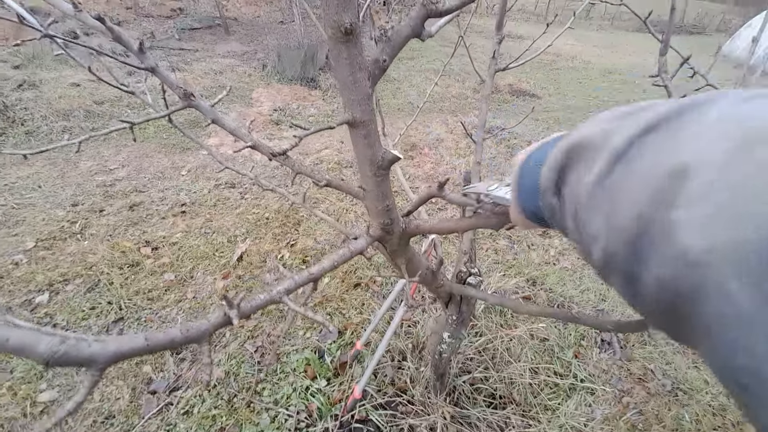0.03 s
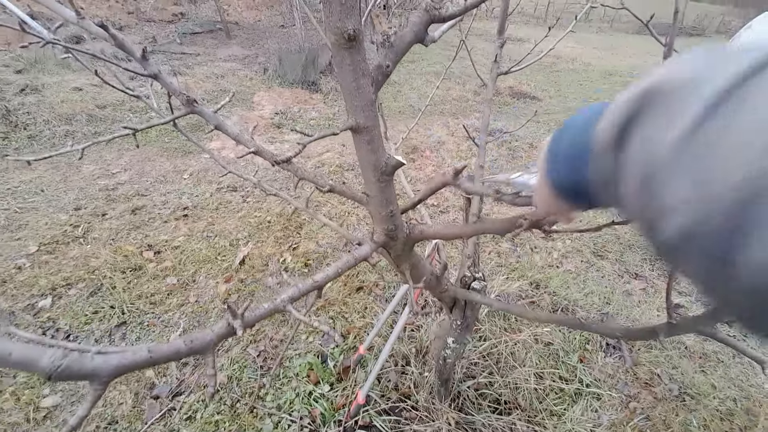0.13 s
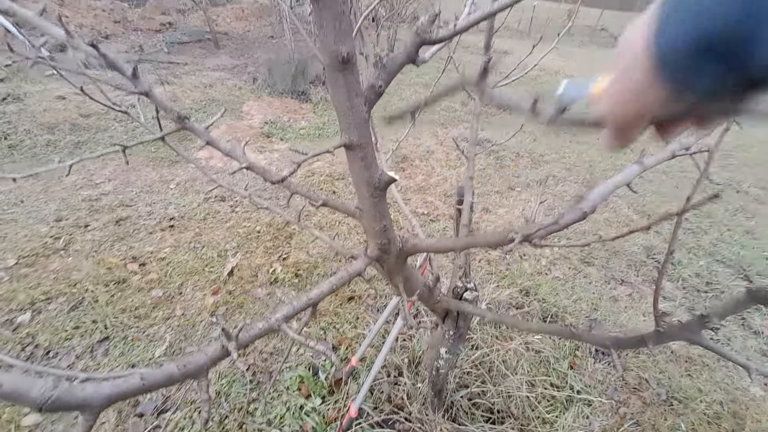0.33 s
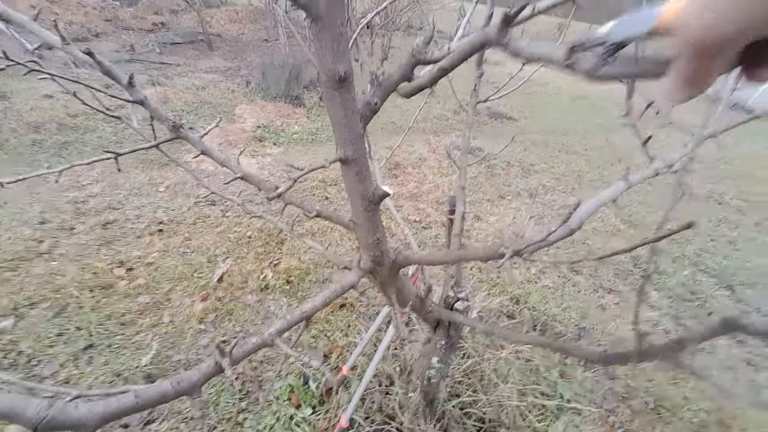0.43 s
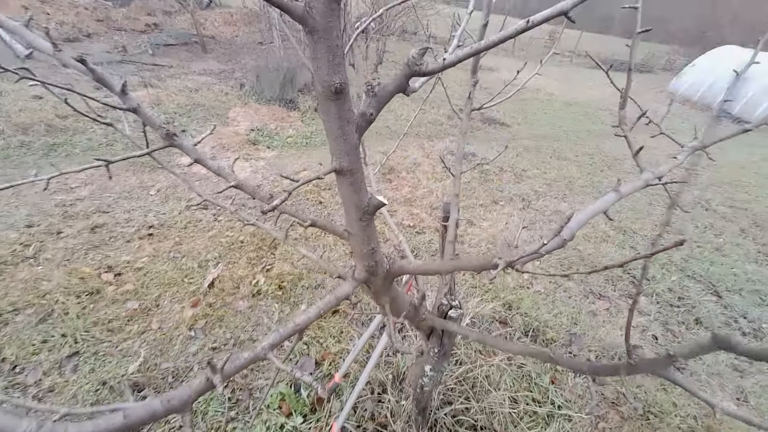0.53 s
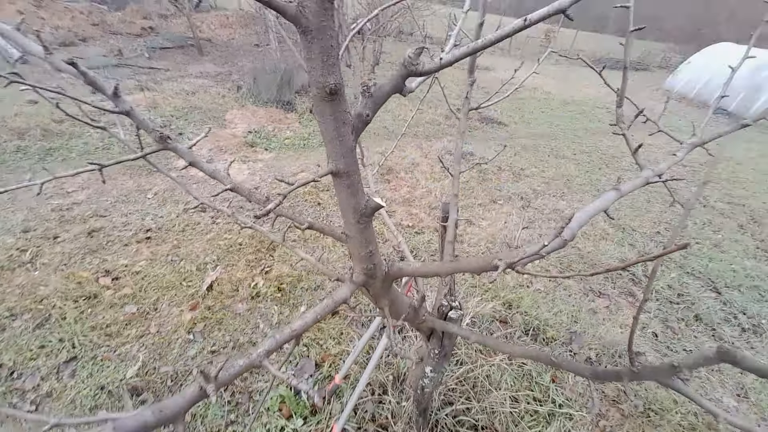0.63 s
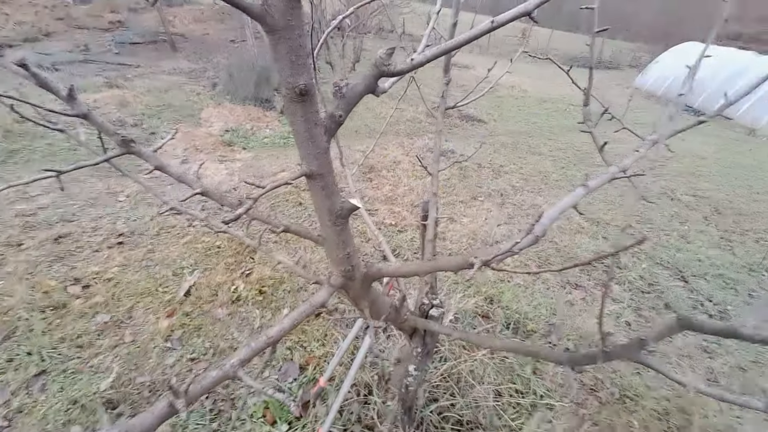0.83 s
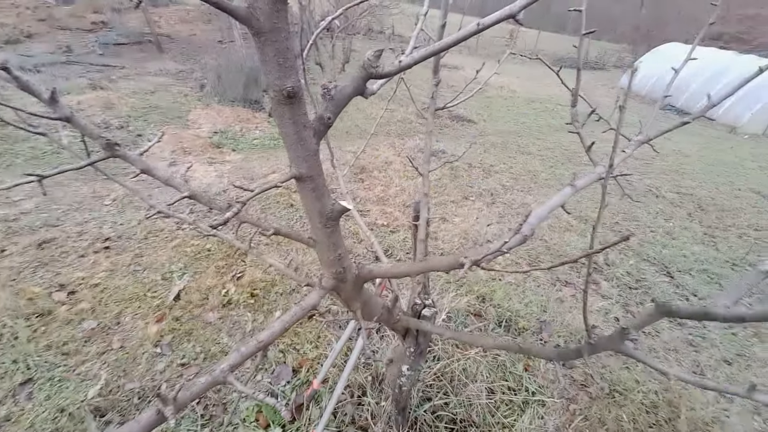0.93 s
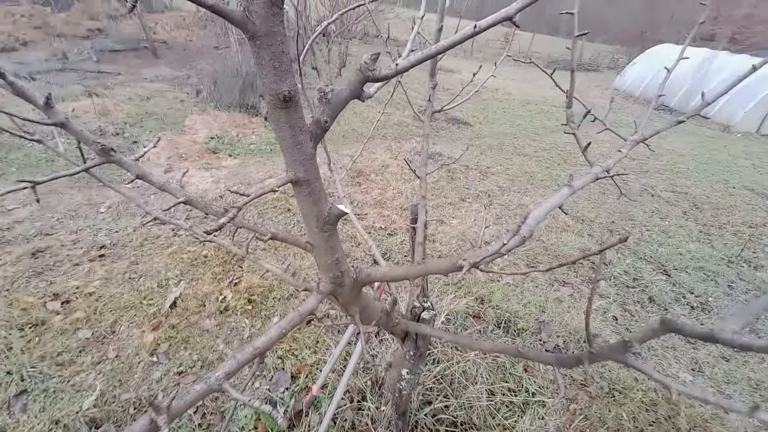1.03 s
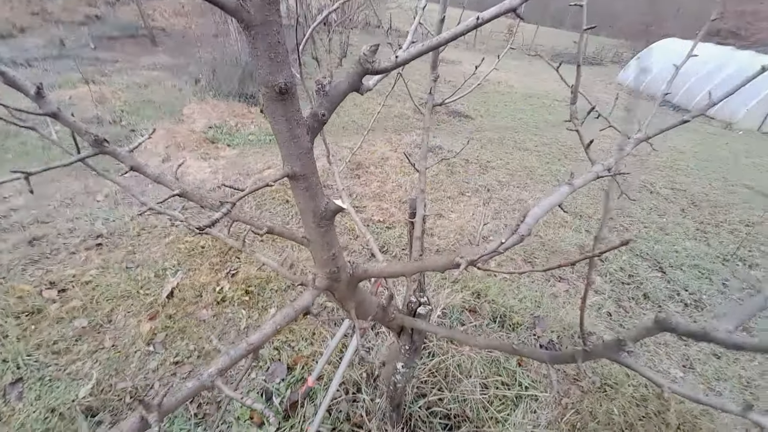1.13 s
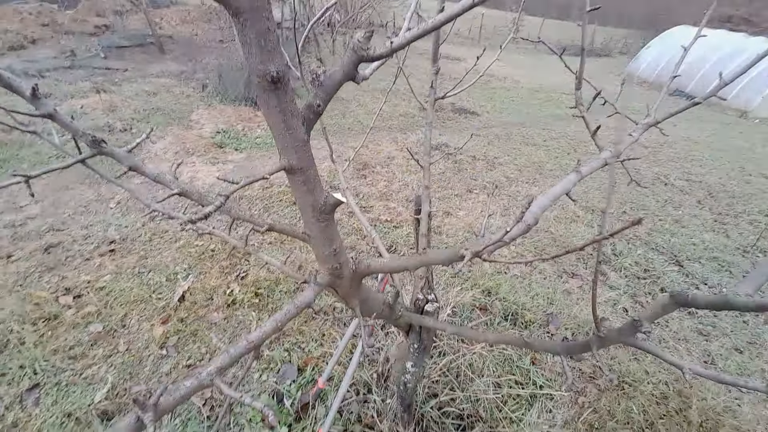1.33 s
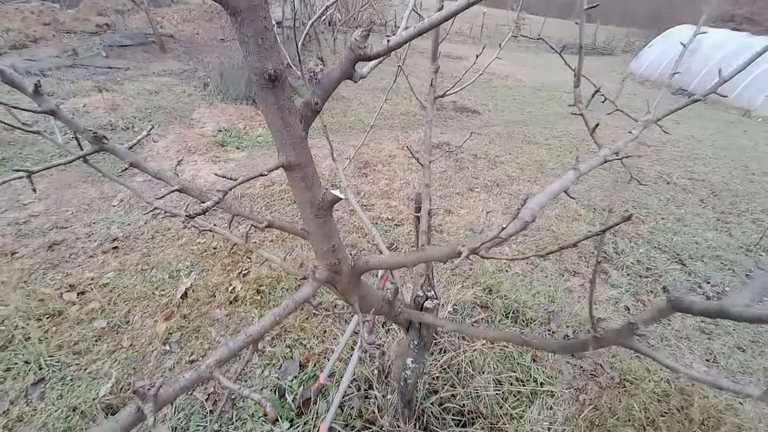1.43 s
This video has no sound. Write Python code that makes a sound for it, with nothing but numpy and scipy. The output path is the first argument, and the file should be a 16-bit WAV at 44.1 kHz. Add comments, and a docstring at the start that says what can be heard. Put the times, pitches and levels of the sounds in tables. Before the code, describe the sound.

Pruning shears clink, knock on a branch and snap shut amid jacket sleeve rustle outdoors

```python
"""A jacket sleeve rustles in short strokes as pruning shears are drawn back from a fruit tree, near the right.
The sleeve is grainy noise swelling in three bands; twig ticks are brief bursts of tiny impacts.
Wood knocks, twice strongly, as damped modes; the steel blades clink, slide and shut with a small snap,
made from rough contacts ringing steel modes and from friction noise around their lowest ring.
Short reflections follow; handling rumble and faint outdoor air are coloured noise underneath."""
import sys
import numpy as np
from scipy import signal
from scipy.io import wavfile
from scipy.ndimage import uniform_filter1d

SR = 44100
rng = np.random.default_rng(int(sys.argv[2]) if len(sys.argv) > 2 else 0)


def log_audio(samples):
    """Write samples as a 16-bit WAV file to the path given in sys.argv[1]."""
    # one column per channel
    frames = np.atleast_2d(samples).T
    # limit to full scale, then quantise
    limited = np.clip(frames, -1, 1)
    pcm = np.round(limited * 32767).astype(np.int16)
    wavfile.write(sys.argv[1], SR, pcm)


N = 66150  # samples
STEEL_ALIKE = 0.32  # left-right likeness of steel sounds: 0 unrelated, 1 identical


def amp(db):
    """Turns decibels into an amplitude gain."""
    return 10 ** (np.asarray(db) / 20)


def evened(x):
    """Scales a signal to unit rms, over both channels together."""
    return x / np.sqrt(np.mean(x ** 2) + 1e-20)


def peaked(x, size=44):
    """Scales each channel so that its loudest millisecond has unit rms."""
    power = uniform_filter1d(x ** 2, size, axis=1)
    return x / np.sqrt(power.max(1, keepdims=True) + 1e-20)


def pan(db):
    """Gives left and right gains for a level difference; negative is to the right."""
    return evened(amp([[db / 2], [-db / 2]]))


def add(mix, start_s, sound):
    """Mixes a stereo sound in at a time, cut at the end of the scene."""
    part = mix[:, round(start_s * SR):][:, :sound.shape[1]]
    part += sound[:, :part.shape[1]]


def pair(x, alike):
    """Blends two unrelated signals into a partly alike left and right."""
    left = alike * x[1] + np.sqrt(1 - alike ** 2) * x[0]
    return np.array([left, x[1]])


def colour(x, points, size=4096):
    """Shapes the spectrum through (pitch_hz, level_db) points with a causal minimum-phase filter."""
    point_hz, point_db = np.transpose(points)
    hz = abs(np.fft.fftfreq(size, 1 / SR))
    curve_db = np.interp(np.log(hz + 1), np.log(point_hz + 1), point_db)
    log_gain = np.log(amp(curve_db))
    spectrum = np.exp(np.conj(signal.hilbert(log_gain)))
    taps = np.fft.ifft(spectrum).real
    return signal.fftconvolve(x, taps[None], axes=1)[:, :x.shape[1]]


def noise(points, alike, size=4096):
    """Makes steady coloured stereo noise of unit rms, skipping the filter's start."""
    hiss = pair(rng.standard_normal((2, N + size)), alike)
    return evened(colour(hiss, points)[:, size:])


def ring(modes, pitch=1, size=3000):
    """Rings damped modes after one blow, each a sine that loses 60 dB in its t60."""
    t = np.arange(size) / SR
    out = np.zeros(size)
    for hz, db, t60_s in modes:
        out += amp(db - 60 * t / t60_s) * np.sin(2 * np.pi * hz * pitch * t)
    return out


def contact(decay_s, alike, size=2000):
    """Makes a brief rough contact: a burst of tiny impacts that dies quickly."""
    attack_s = 0.00054
    t = np.arange(size) / SR
    impacts = pair(rng.choice([-1., 1.], (2, size)), alike)
    return impacts * np.minimum(t / attack_s, 1) * np.exp(-t / decay_s)


def sleeve():
    """Fabric slips in dense grains; each stroke swells and fades with its own brightness."""
    # Sleeve strokes: peak_s, rise_s, fall_s, bass_db, middle_db, treble_db, left_right_db (before the band's pan)
    strokes = [(.01, .02, 0.029, -64, -59, -59.5, -5), (0.189, 0.063, 0.037, -71, -75, -57, -2),
               (0.291, 0.054, 0.045, -51, -57.5, -52, -6), (0.366, 0.032, 0.03, -46, -56, -71, -8.5),
               (0.423, 0.038, 0.022, -48.5, -47.5, -47, -7.5), (0.504, 0.041, 0.011, -47.5, -47, -39, -6),
               (0.574, 0.036, 0.029, -58, -52, -54.5, -7.5), (0.622, 0.034, 0.02, -52, -45, -39.5, -6.5),
               (0.697, .018, 0.0047, -57, -48, -40, -7), (0.737, 0.024, 0.036, -60, -55, -58, -9.5),
               (0.825, 0.01, 0.013, -52.5, -51.5, -58.5, -19),
               (.849, 0.014, .022, -55.5, -57.5, -57.5, -2.5), (0.891, 0.0023, .006, -57, -48, -49.5, -4),
               (0.904, 0.015, 0.022, -55, -55.5, -58, -5), (1.055, 0.0098, 0.02, -63, -61.5, -64, -3),
               (1.108, 0.0087, 0.019, -68, -56, -50, -6), (1.331, 0.014, 0.027, -87, -66, -70, -6)]
    # Tone of the fabric: pitch_hz, level_db
    cloth_tone = [(120, -30), (220, -23), (420, -15), (650, -11.5), (850, -15.5), (1300, -3), (2000, -5.5),
                  (2400, -6.5), (3500, -4), (4700, -11), (6000, -5.5), (7500, -7.5), (9000, -19.5),
                  (10800, -16), (12000, -14.5), (15000, -11.5), (16000, -18)]
    # Edges of the bass, middle and treble bands: pitch_hz
    edges_hz = [250, 1000, 3200, 16500]
    # Left-right likeness of bass, middle and treble: 0 to 1
    band_alike = [0.41, 0.96, 0.083]
    # Pan added to every stroke in bass, middle and treble: left_right_db
    band_pan_db = [0.5, 5.5, 8]
    grains_per_s, grain_spread_db = 5000, 3.2
    smooth_share = .55  # of the friction's power; the rest is grains
    stroke_shape = 0.95  # exponent of the swell: 1 is exponential, 2 a bell

    t = np.arange(N) / SR
    grain_gain = amp(grain_spread_db * np.minimum(rng.exponential(1, N), 4))
    slips = evened(grain_gain * (rng.random(N) < grains_per_s / SR))
    roughness = np.sqrt(smooth_share + (1 - smooth_share) * slips ** 2)
    friction = rng.standard_normal((2, N)) * roughness
    cloth = colour(crinkle(friction), cloth_tone)
    out = np.zeros((2, N))
    for k in range(3):
        band_filter = signal.butter(4, edges_hz[k:k + 2], "band", fs=SR, output="sos")
        band = evened(signal.sosfilt(band_filter, pair(cloth, band_alike[k])))
        power = 0  # strokes that overlap add their power
        for peak_s, rise_s, fall_s, *levels_db, side_db in strokes:
            width_s = np.where(t < peak_s, rise_s, fall_s)
            swell = np.exp(-(abs(t - peak_s) / width_s) ** stroke_shape)
            power = power + (amp(levels_db[k]) * swell * pan(side_db + band_pan_db[k])) ** 2
        out += band * np.sqrt(power)
    return out


def crinkle(x, size=128):
    """Tiny folds each favour their own pitch for a few milliseconds: random patches of spectral gain."""
    patch_db, patch_frames, patch_bins = 2.6, 5, 3
    overlap = size * 3 // 4
    spectrum = signal.stft(x, nperseg=size, noverlap=overlap)[2]
    patches = rng.standard_normal(spectrum.shape[1:])
    patches = uniform_filter1d(patches, patch_bins, axis=0)
    patches = evened(uniform_filter1d(patches, patch_frames, axis=1))
    return signal.istft(spectrum * amp(patch_db * patches), nperseg=size, noverlap=overlap)[1][:, :N]


def knocks():
    """Dull blows ring wooden modes, with a softened attack and the bass cut."""
    # Blows on wood: start_s, level_db, pitch_factor, left_right_db
    blows = [(.3268, -27, 0.707, -7), (0.3691, -11.5, 1.033, -5.5), (0.3823, -16.5, 1.157, -8.5),
             (.429, -31, 0.99, -11), (0.8455, -48, 1.94, -18), (1.033, -43, 1.07, -1)]
    # Modes of the wood: pitch_hz (at pitch factor 1), level_db, t60_s
    wood_modes = [(736, -2, 0.017), (910, -1.5, 0.0077), (1065, -8, 0.019), (1626, -7, 0.0083),
                  (1990, -17, 0.0039), (3900, -25, 0.014), (7460, -17, 0.0046)]
    attack_s = .0007
    low_cut_hz = 620  # at pitch factor 1
    out = np.zeros((2, N))
    for start_s, db, pitch, side_db in blows:
        wood = ring(wood_modes, pitch)
        t = np.arange(len(wood)) / SR
        softened = wood * (1 - np.exp(-t / attack_s))
        b, a = signal.butter(2, low_cut_hz * pitch, "high", fs=SR)
        add(out, start_s, amp(db) * pan(side_db) * signal.lfilter(b, a, softened))
    return out


def hollow_note():
    """One soft hollow note: a centred sine that swells and dies within milliseconds."""
    peak_s, pitch_hz, level_db, width_s = 0.016, 465, -41.5, 0.0031
    t = np.arange(N) / SR
    return amp(level_db) * np.exp(-abs(t - peak_s) / width_s) * np.sin(2 * np.pi * pitch_hz * t)


def twigs():
    """Dry ticks without a ring: rough contacts, each with more or less body and top."""
    # Twig ticks: start_s, peak_db, decay_s, body_db, top_db, left_right_db
    ticks = [(0.028, -43.5, 0.0017, 0, -21, 4), (0.183, -42, 0.0037, -4, -19, 9),
             (.187, -43, 0.00067, 40, 10, -49), (.244, -34, 0.0013, -0.5, -15.5, 3),
             (0.27, -43.5, 0.0012, 3, -4, 22), (0.29, -43, 0.0007, 10, -12, 8),
             (.319, -41, 0.0021, 10, -9, 8), (0.5591, -40, .0015, -5, -13, 4),
             (.567, -41.5, 0.00078, 6, -15, 0), (0.606, -37, .001, 6, 2, -10),
             (.608, -27.5, 0.00048, -9, -6.5, 17), (0.616, -39, 0.0012, 5, 0, -16),
             (0.6351, -24.5, 0.0015, 6.5, -20, -5.5), (0.686, -35.5, 0.0013, -2, -4, -1),
             (.7, -34, 0.0028, 6, -11, -5), (0.7272, -37.5, 0.0022, 5, -10.5, -2),
             (0.808, -43, .0018, 14, -13, 4), (0.818, -45.5, 0.0029, 12, -11, 4),
             (.843, -40.5, 0.004, 27.5, -7, 0), (.8992, -36.5, 0.00089, 16.5, -13, -2),
             (1.0312, -42.5, 0.005, 9, -15.5, 0.5), (1.0492, -55.5, 0.0031, -5, -22, 7),
             (1.169, -56, 0.006, 11, -8, -6), (1.185, -55, 0.0032, 5, -7, 0)]
    # Tone shared by the ticks, before body and top: pitch_hz, level_db
    tick_tone = [(150, -26), (700, -17), (2400, -6), (4000, -2.5), (7200, 1.5), (9500, -2.5), (12500, 2.5),
                 (16000, -3.5)]
    # Body boost or cut is full below the first and gone above the second: pitch_hz
    body_hz = [2020, 4170]
    # Top boost or cut starts at the first and is full above the second: pitch_hz
    top_hz = [6480, 9340]
    out = np.zeros((2, N))
    hz, tone_db = np.transpose(tick_tone)
    for start_s, peak_db, decay_s, body_db, top_db, side_db in ticks:
        body = np.interp(hz, body_hz, [body_db, 0])
        top = np.interp(hz, top_hz, [0, top_db])
        tick = colour(contact(decay_s, alike=0.39), np.c_[hz, tone_db + body + top])
        add(out, start_s, amp(peak_db) * pan(side_db) * peaked(tick))
    return out


def steel(hits, modes, contact_s):
    """Rough contacts ring hand-damped steel, too small to radiate bass."""
    low_cut = signal.butter(N=12, Wn=1500, btype="high", fs=SR, output="sos")  # Wn in Hz
    out = np.zeros((2, N))
    for start_s, peak_db, side_db in hits:
        hit = signal.fftconvolve(contact(contact_s, STEEL_ALIKE), ring(modes)[None], axes=1)
        hit = signal.sosfilt(low_cut, hit)
        add(out, start_s, amp(peak_db) * pan(side_db) * peaked(hit))
    return out


def clinks():
    """Loose blades clink: contacts ring the blades' modes."""
    # Clinks: start_s, peak_db, left_right_db
    clink_hits = [(.4648, -30, -3), (.471, -47, 16), (.4981, -35, -12), (.5055, -32, -4),
                  (.625, -37.5, -13), (.737, -41, -1)]
    # Modes of the blades: pitch_hz, level_db, t60_s
    blade_modes = [(2334, -7, 0.031), (2438, 0.5, 0.023), (3190, -13, 0.054), (5240, -5.5, 0.01),
                   (6400, -19, 0.0053), (7770, -7, 0.012)]
    return steel(clink_hits, blade_modes, contact_s=.0009)


def snaps():
    """The shears snap shut with a faint touch before and weaker clicks after, ringing short, bright modes."""
    # Light touch, snap and after-clicks: start_s, peak_db, left_right_db
    snap_hits = [(1.0945, -43, -4), (1.0985, -27, -1.5), (1.1065, -37.5, -10), (1.1188, -69, -8)]
    # Modes of the catch: pitch_hz, level_db, t60_s
    catch_modes = [(1660, -2.5, .014), (2120, 2, 0.0045), (2620, -13, 0.012), (3000, 3, 0.0063),
                   (4030, 2, 0.0055), (6030, -7, 0.0058), (7060, 11.5, 0.0041), (8140, 6, .004),
                   (9400, -3.5, .003), (11400, 11, 0.0015), (13300, -6, 0.0023), (15200, 1, 0.0024)]
    return steel(snap_hits, catch_modes, contact_s=0.00094)


def slides():
    """Light friction between the blades sings softly around their lowest ring."""
    # Blades sliding on each other: peak_s, half_length_s, level_db, left_right_db
    strokes = [(0.467, 0.011, -43, 3), (0.507, 0.013, -42.5, 8), (1.067, .011, -59, -5),
               (1.255, 0.022, -71, -13), (1.322, 0.01, -58, -13), (1.348, 0.04, -70.5, -15)]
    # Tone of the friction: pitch_hz, level_db
    slide_tone = [(200, -54), (1200, -35), (1700, -9), (2000, -7), (2300, 10), (2500, 10), (3000, -16),
                  (4000, -10), (8500, -16.5), (16000, -25)]
    t = np.arange(N) / SR
    level = np.zeros((2, N))
    for peak_s, half_s, db, side_db in strokes:
        level += amp(db) * pan(side_db) * np.exp(-((t - peak_s) / half_s) ** 2)
    return level * noise(slide_tone, STEEL_ALIKE)


def scatter(x, size=6000):
    """Short weak reflections from the body, tree and ground: a decaying noise echo."""
    t = np.arange(size) / SR
    decay = amp(-60 * t / 0.056)  # t60 in seconds
    tail = rng.standard_normal((2, size)) * decay * (t > .002)  # none in the first 2 ms
    return signal.fftconvolve(x, evened(tail) / np.sqrt(size), axes=1)[:, :N]


def background():
    """Faint outdoor air, low rumble and the hand shifting on the microphone's housing, all coloured noise."""
    # Level of the handling, before its pan: time_s, level_db
    handling_level = [(0.0, -67.5), (0.074, -69), (0.096, -75), (0.216, -75), (0.254, -74), (0.296, -69.5),
                      (0.338, -62), (0.38, -50), (0.416, -74), (0.442, -48.5), (0.492, -63), (0.512, -52),
                      (0.564, -65), (0.764, -62), (0.798, -81), (0.898, -59.5), (0.98, -76), (1.5, -90.5)]
    # Tone of the handling: pitch_hz, level_db
    handling_tone = [(20, -42.5), (60, -4), (100, 5.5), (200, 4), (320, 0), (700, -26.5), (3000, -52)]
    # Level of the low rumble: time_s, level_db
    rumble_level = [(0.0, -73), (0.032, -64.5), (0.132, -81), (0.232, -71), (0.296, -59), (0.642, -72),
                    (0.71, -69), (0.798, -74), (0.94, -66), (0.968, -77), (1.018, -64), (1.144, -70),
                    (1.164, -73.5), (1.274, -81), (1.352, -65), (1.5, -79.5)]
    # Tone of the low rumble: pitch_hz, level_db
    rumble_tone = [(15, -8), (40, -48), (57, 5), (66, -6), (85, -13.5), (200, -45), (1000, -79)]
    # Tone of the air: pitch_hz, level_db
    air_tone = [(60, -11.5), (120, -3.5), (300, -8.5), (750, -3.5), (1300, -6.5), (2400, -12), (3500, -16),
                (5200, -16.5), (6900, -10), (9500, -23.5), (12500, -18), (16000, -17)]
    bass_alike = 0.72
    t = np.arange(N) / SR
    handling_gain = amp(np.interp(t, *np.transpose(handling_level)))
    handling = handling_gain * noise(handling_tone, bass_alike) * pan(-3.5)
    rumble_gain = amp(np.interp(t, *np.transpose(rumble_level)))
    rumble = rumble_gain * noise(rumble_tone, bass_alike)
    air = amp(-69.5) * noise(air_tone, alike=0.13)
    return handling + rumble + air


def scene():
    """Mixes the near sounds, which reach the left side a little later, over the background."""
    left_lag_s = .00043
    clicks = twigs() + clinks() + snaps()
    wood = knocks() + hollow_note()
    reflections = scatter(amp(-11.5) * clicks + amp(-21) * wood)
    left, right = sleeve() + wood + clicks + slides() + reflections
    late_left = np.r_[np.zeros(round(left_lag_s * SR)), left][:N]
    return np.array([late_left, right]) + background()


def record(dry):
    """The recorder's band limit: a steep linear-phase low-pass."""
    edge_hz = 16050
    taps = signal.firwin(401, edge_hz, window=("kaiser", 9), fs=SR)
    return signal.oaconvolve(dry, taps[None], "same")


dry = scene()
out = record(dry)
log_audio(out)
```